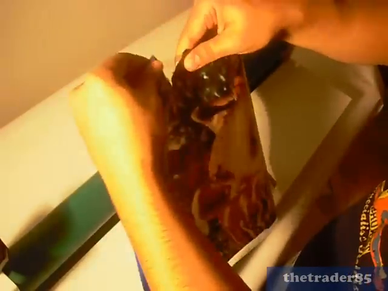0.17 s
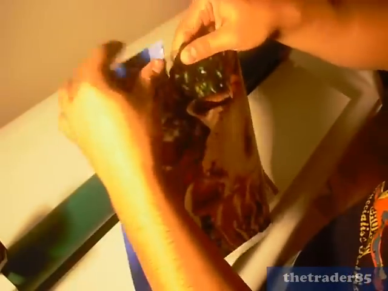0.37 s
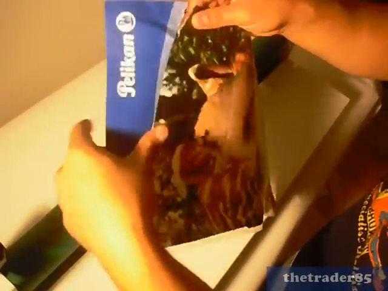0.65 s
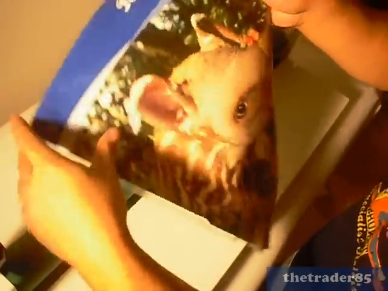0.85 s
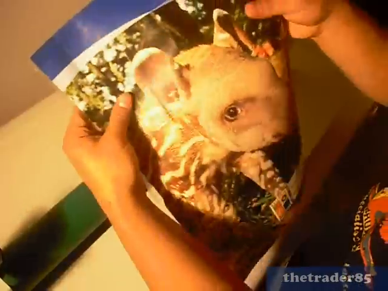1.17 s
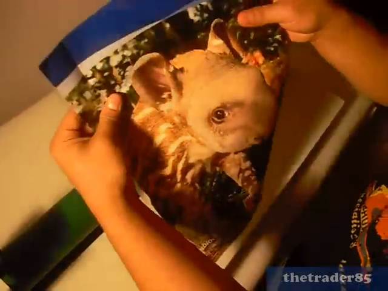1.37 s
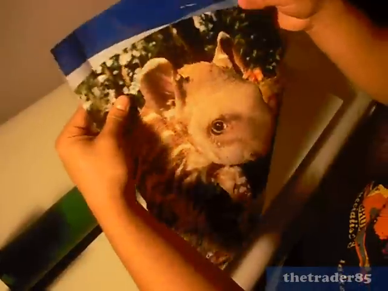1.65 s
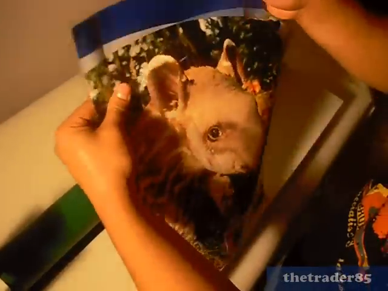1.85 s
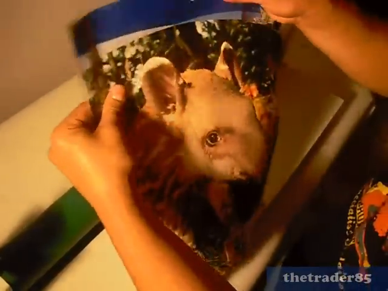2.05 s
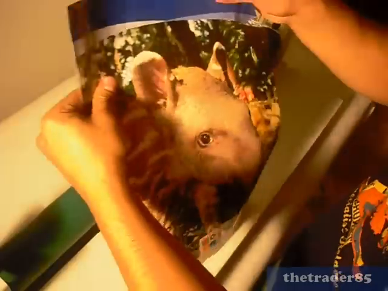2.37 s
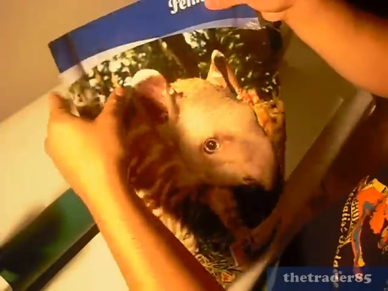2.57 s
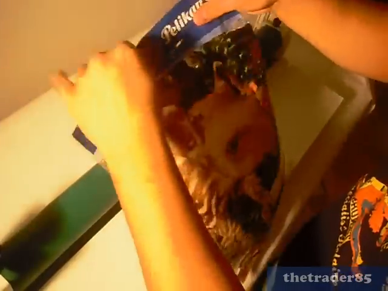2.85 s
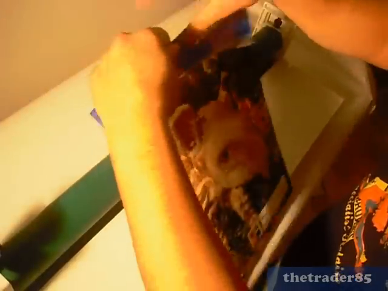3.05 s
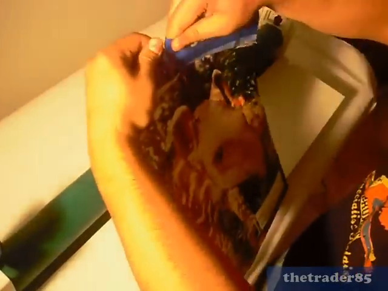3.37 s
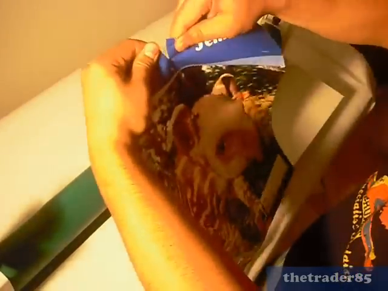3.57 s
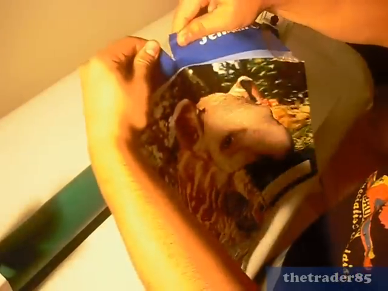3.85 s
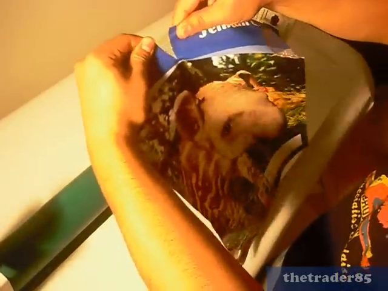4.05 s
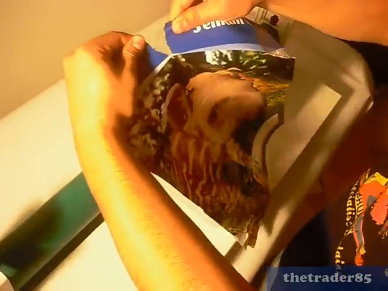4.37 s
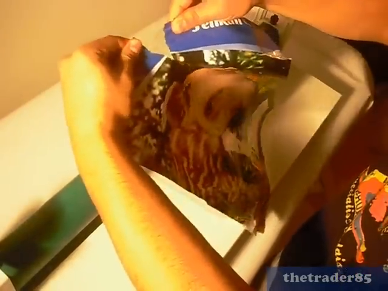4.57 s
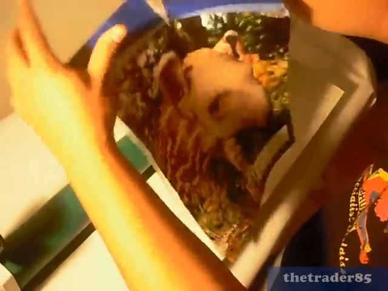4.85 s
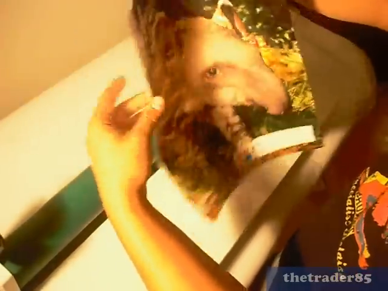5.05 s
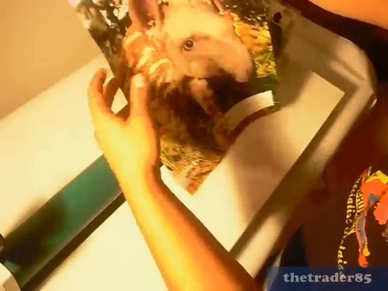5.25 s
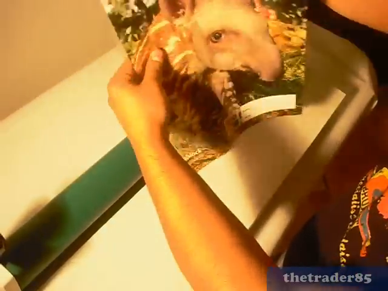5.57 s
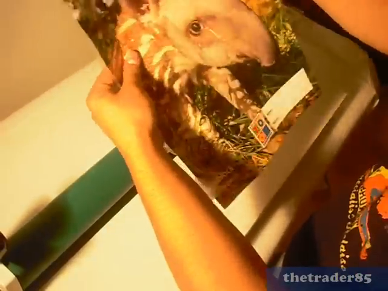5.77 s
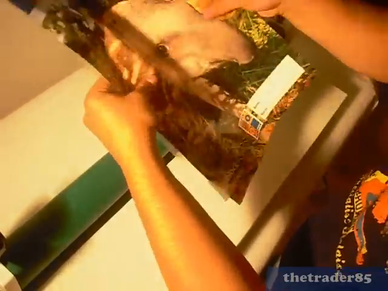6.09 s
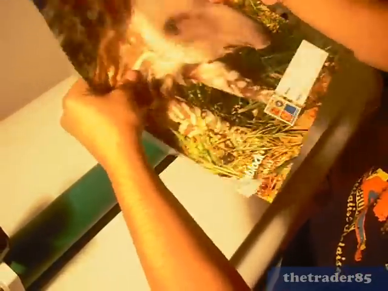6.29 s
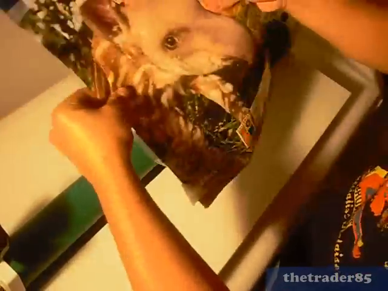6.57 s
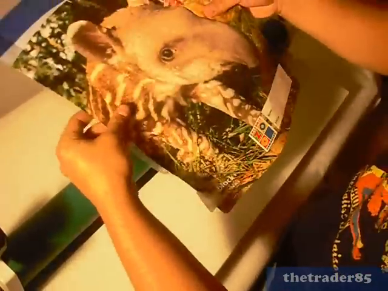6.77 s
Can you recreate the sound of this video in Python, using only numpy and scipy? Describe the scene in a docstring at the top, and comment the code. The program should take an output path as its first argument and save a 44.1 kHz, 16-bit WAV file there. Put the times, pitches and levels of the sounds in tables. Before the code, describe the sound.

Close to the microphone, hands bend a stiff glossy sheet in a small hard room. Sparse light crinkles thicken into hollow creasing pops, leading to a hard flap a little after two seconds. Quieter dry ticks and faint rustle follow, with one bright sharp snap near five seconds. At the end come violent cracks, the loudest clipping the input with a low thump, over faint room hush and a very high whine.

```python
"""Flexing a laminated sheet

Hands flex a laminated sheet close to a microphone in a small hard room. Each crease that snaps through is
a short volley of noise ringing the sheet's resonances; short bursts make ticks, crackles and hiss make
rustle, and fingers swish. Two hard flaps overload the input, and a low decaying swing thumps at the hardest.
Fading noise and lingering tones form the room; shaped noise is its hush, two steady tones the screens' whine."""
import sys
import numpy as np
from scipy import signal
from scipy.fft import rfft, irfft
from scipy.io import wavfile
from scipy.ndimage import uniform_filter1d

SR = 44100
rng = np.random.default_rng(int(sys.argv[2]) if len(sys.argv) > 2 else 0)


def unload_audio(sound):
    """Save the sound as a 16-bit wav file, at the path given as the first command line argument."""
    columns = np.transpose(np.atleast_2d(sound))
    # keep every value between -1 and 1, then stretch to whole-number steps
    steps = np.round(np.clip(columns, -1, 1) * 32767)
    wavfile.write(sys.argv[1], SR, steps.astype(np.int16))


N = 305172  # length of the scene in samples

# Creases snapping through. Each row: start in seconds, then peak levels in dB of the flap of air, the sheet's
# body, the crack and the film, then length in ms (kept within 0.3 to 10 when played), room share in dB.
SNAPS = [(0.0157, -59, -43, -40.5, -65, 3, 7), (0.0908, -59, -47, -24.5, -20.5, 2.4, 7),
         (0.4617, -46, -47, -38, -36.5, 0.86, 11.5), (0.4858, -55, -34, -35, -31, 5.5, 3),
         (0.6252, -71, -50, -38, -36.5, 3.8, 1), (0.8542, -68, -54, -36.5, -41, 3.8, 2),
         (1.0639, -44.5, -31.5, -34, -57, 1.8, 3), (1.1409, -31, -33.5, -31, -31, 2.3, 4),
         (1.1718, -41, -30.5, -29, -28.5, 0.99, -10), (1.1804, -43, -30, -29, -56, 2, 1.5),
         (1.2246, -58, -34.5, -20.5, -23, 1.6, 0), (1.2471, -64, -39, -36, -65, 2.4, 4),
         (1.3499, -39, -30.5, -39, -63, 6.2, 2.5), (1.4824, -35.5, -20.5, -27, -32, 3.4, 0),
         (1.7104, -50, -39.5, -38, -39, 1.2, 9.5), (1.8856, -59, -46, -28, -24, 2.3, -4.5),
         (1.9135, -39.5, -44, -44, -57, 3.1, 12), (1.9254, -49, -37, -48, -51, 1.6, 8.5),
         (1.9616, -39.5, -48, -17.5, -18, 2.3, -5), (2.0066, -49, -38.5, -32.5, -67, 1.5, 2.5),
         (2.1252, -41, -26, -27, -63, 0.57, 5.5), (2.1555, -37, -17.5, -20.5, -41, 2.1, 4.5),
         (2.1782, -40, -18.5, -12.5, -52, 3.9, -2), (2.18, -22.5, -27, -25, -24.5, 2.4, -2),
         (2.2176, -46, -30.5, -34, -56, 1.9, 8.5), (2.2886, -32, -21.5, -21.5, -43, 12, -0.5),
         (2.3035, -53, -41, -18, -58, 1.8, -5), (2.3532, -61, -30, -34, -52, 1.7, -10),
         (2.3788, -17, -13, -13, -21, 9.9, -12), (2.3858, -10, -8, -5.5, -21, 2.9, -2),
         (2.6618, -56, -39, -36, -45, 2, 1), (2.8636, -56, -57, -38.5, -34.5, 8.2, 9.5),
         (2.9988, -63, -41.5, -41.5, -46, 2.2, 6), (3.021, -48, -43, -31, -32.5, 2.4, -19),
         (3.0382, -71, -41, -48, -56, 1.6, 6.5), (3.1843, -65, -30.5, -31.5, -25.5, 4.8, 2.5),
         (3.3498, -44, -29, -28.5, -74, 4.5, 0), (3.4337, -55, -36, -27.5, -20.5, 2.3, 4.5),
         (3.5355, -49, -34.5, -34.5, -31, 3, 3), (3.6798, -50, -28.5, -16.5, -15.5, 2.4, 0.5),
         (4.0098, -63, -50.5, -44.5, -38, 3, 6.5), (4.1448, -61, -34, -30, -25.5, 1.4, 1.5),
         (4.283, -60, -35, -35, -31, 1.2, 1), (4.3569, -71, -37, -38, -49, 1.3, -5),
         (4.4954, -72, -34, -34, -33, 1.4, 5.5), (4.6204, -64, -48, -39.5, -36, 3.2, 11),
         (4.8059, -52, -38.5, -32.5, -31.5, 2.9, 2.5), (4.88, -52, -34, -28.5, -29, 2.4, 3),
         (4.8903, -62, -31, -28, -43, 6.3, -1), (4.9143, -61, -23.5, -7.5, -9.5, 1.6, -39),
         (4.9242, -40, -29, -37, -18, 1.5, -25), (5, -53, -45.5, -34.5, -32, 2.3, -3),
         (5.097, -61, -48, -39, -36.5, 1.6, 10), (5.1398, -59, -27, -31, -31.5, 1.1, 2.5),
         (5.1484, -40, -56, -26, -39, 2.2, 2.5), (5.2348, -57, -38.5, -35, -36, 3.6, 3.5),
         (5.5143, -66, -51, -33, -41, 2.5, 1), (5.6536, -68, -44, -39, -39, 1.1, -8),
         (5.6825, -64, -42, -41, -54, 2.5, -10), (5.7072, -43, -36, -33, -35, 6.1, 2),
         (5.7193, -44, -34.5, -39, -41, 3.4, 5), (5.7667, -52, -43, -30.5, -35, 4.1, 1.5),
         (6.009, -52, -48, -44.5, -47, 2.5, 12), (6.0352, -61, -40.5, -33.5, -55, 1.15, 2),
         (6.0474, -66, -39.5, -53, -49, 8.9, 13.5), (6.0614, -42, -37, -20.5, -17, 2, 0.5),
         (6.1547, -44, -41, -50, -55, 1.9, 11), (6.1715, -62, -36, -46, -46, 7.4, 2),
         (6.1991, -42, -35, -32.5, -63, 2.5, -3), (6.2996, -49, -36, -63, -47, 4.2, 2),
         (6.3069, -25.5, -25, -36, -46, 1.4, 2), (6.3178, -36, -8, -15, -7.5, 4.2, 2),
         (6.323, -16.5, -6, 0.5, -35, 2.4, 0.5), (6.3292, -22, -0.5, -4.5, -42, 3.3, -3),
         (6.444, -47, -21, -24, -46, 3.2, 12), (6.4863, -39, -27, -11.5, -8.5, 2.2, -18),
         (6.5352, -38, -21, -42, -27, 6.9, -13), (6.5468, -7.5, 9.5, 4.5, -22, 6.4, -3),
         (6.6377, -51, -22, -27, -39, 1.8, -7)]
# How tightly the sheet is bent sets the body pitch of its snaps. Each row: time in seconds, pitch in Hz.
BEND = [(0, 694), (1.05, 670), (1.16, 500), (1.24, 730), (1.5, 470), (1.71, 670), (2.17, 760), (2.3, 604),
        (3.1, 605), (3.18, 720), (3.45, 590), (3.68, 880), (4.28, 820), (4.36, 516), (4.5, 920), (4.8, 630),
        (5.7, 595), (6.45, 554), (6.55, 857), (6.64, 860)]
# What the parts of the sheet ring with. Each row: pitch in Hz, width in Hz, relative level in dB.
FLAP = [(74.4, 103, -16), (161, 155, 4), (284, 130, 0)]
BODY = [(259.4, 72, -2), (537, 185, 4), (720, 120, 1), (960, 160, 1), (1370, 3000, -3)]
CRACK = [(1920, 1740, -7), (2262, 805, -2.5), (2856, 800, -3.5), (4260, 2420, -5)]
FILM = [(6500, 4140, 2.5), (9500, 21000, 3), (13800, 1400, -18.5)]
PITCH_SCATTER_OCT, BODY_SPREAD_OCT = 0.017, 0.87  # a snap favours the body modes near its pitch
CRACK_TILT = 0.37  # dB per octave for each dB of film over crack, counted from 14 dB below the crack
CRACK_SCATTER = 0.09  # every snap detunes the crack modes by about this fraction
RISE_SHARE = 0.069  # build-up time of a snap, in lengths
SHARP_SHARE = 22  # time of the treble's extra decay, in lengths


def snaps():
    """Each snap is a swelling, then dying volley of small releases, sent into every part of the sheet."""
    ms = np.arange(1600) / SR * 1000
    near, far = np.zeros((2, N + SR))
    for start, *levels, length, room_db in SNAPS:
        flap_db, body_db, crack_db, film_db = levels
        bend, *detune = np.clip(rng.standard_normal(1 + len(CRACK)), -2, 2)
        length = np.clip(length, 0.3, 10)
        swell = (1 - np.exp(-ms / (RISE_SHARE * length))) * np.exp(-ms / length)
        # the product of two noises is spikier than plain noise
        volley = rng.standard_normal(len(ms)) * np.abs(rng.standard_normal(len(ms))) * swell
        sharp = volley * np.exp(-ms / (SHARP_SHARE * length))  # the treble leaves first

        pitch_hz = np.interp(start, *np.transpose(BEND)) * 2 ** (PITCH_SCATTER_OCT * bend)
        body = [(hz, width, db - 6 * (np.log2(hz / pitch_hz) / BODY_SPREAD_OCT) ** 2)
                for hz, width, db in BODY]
        # a snap with much film in it cracks brighter
        tilt_db = CRACK_TILT * np.clip(film_db - crack_db + 14, -15, 15)
        crack = [(hz * (1 + CRACK_SCATTER * shift), width, db + tilt_db * np.log2(hz / 3000))
                 for (hz, width, db), shift in zip(CRACK, detune)]

        # the whole sheet pushes the air in one smooth stroke; the finer parts answer each release
        stroke = np.gradient(-swell)
        add(near, far, start, stroke, ring(FLAP), flap_db, room_db)
        add(near, far, start, volley, ring(body), body_db, room_db)
        add(near, far, start, sharp, ring(crack), crack_db, room_db)
        add(near, far, start, sharp, ring(FILM), film_db, room_db)
    return np.array([near[:N], far[:N]])


def ring(modes):
    """A struck part sounds as decaying resonances: wide ones die fast; signs alternate, total energy is 1."""
    t = np.arange(1024) / SR
    body = np.zeros(len(t))
    for k, (hz, width, db) in enumerate(modes):
        strength = (-1) ** k * undb(db) * np.sqrt(width)
        body += strength * np.exp(-np.pi * width * t) * np.sin(2 * np.pi * hz * t)
    return body / np.sqrt(np.sum(body ** 2))


def add(near, far, start, push, body, peak_db, room_db):
    """A push rings a body at a peak level; the walls get its energy, offset by the room share, in plain colour."""
    sound = signal.fftconvolve(push, body)
    sound *= undb(peak_db) / np.max(np.abs(sound))
    at = int(start * SR)
    near[at:at + len(sound)] += sound
    far[at:at + len(body)] += body * undb(room_db) * np.sqrt(np.sum(sound ** 2))


# The clearest lone ticks of the film. Each row: start in seconds, peak level in dB, colour (band centre) in Hz.
TICKS = [(0.0245, -35, 6600), (0.083, -30, 9500), (0.09, -25, 9600), (0.1075, -21, 9700),
         (0.1244, -31, 9500), (0.1365, -21.5, 7200), (0.466, -31.5, 5170), (0.5033, -31.5, 6900),
         (0.5241, -34, 4670), (0.9218, -41, 7800), (1.106, -36.5, 4500), (1.1858, -38, 4200),
         (1.2077, -35, 6000), (1.2215, -37, 5800), (1.3327, -37, 4800), (1.4026, -42, 3900),
         (1.4342, -36, 5000), (1.4928, -38, 4400), (1.5087, -28, 4700), (1.643, -47, 5100),
         (1.736, -37, 6500), (1.777, -38, 6300), (1.8041, -39, 5700), (1.8403, -35.5, 3500),
         (1.856, -45, 4900), (1.9741, -26.5, 7000), (2.1178, -37.5, 6560), (2.1858, -27, 5460),
         (2.384, -16, 5020), (2.4909, -27, 5900), (2.5085, -30.5, 6500), (2.525, -33, 5360),
         (2.5687, -35.5, 5000), (2.6866, -51, 5400), (2.8782, -31.5, 7300), (2.9543, -37.5, 4850),
         (3.0066, -42, 6500), (3.0985, -43, 7840), (3.4384, -29, 6300), (3.5552, -34, 8500),
         (3.593, -42, 8200), (3.6393, -37, 9800), (3.6704, -41, 9800), (3.7334, -34.5, 7900),
         (3.7901, -36, 9900), (3.8202, -32.5, 7260), (3.9298, -38.5, 7500), (4.0188, -37, 8700),
         (4.1095, -37, 8900), (4.1292, -38, 8100), (4.186, -33, 7540), (4.2755, -36, 8850),
         (4.3302, -35, 8400), (4.3444, -37, 7400), (4.4036, -35, 8200), (4.4859, -37, 8200),
         (4.5484, -36, 6000), (4.6471, -33, 7200), (4.8397, -36, 6640), (4.8686, -36, 7100),
         (4.9028, -28, 7100), (4.959, -35, 8600), (5.0314, -44, 7300), (5.1522, -33, 5550),
         (5.247, -34, 6260), (5.3385, -42, 5900), (5.3818, -40, 6160), (5.4143, -40, 6500),
         (5.5122, -34.5, 5930), (5.884, -37.5, 5650), (5.9636, -44, 5540), (6.0642, -20, 5100),
         (6.1242, -36, 5700), (6.4314, -30, 4000), (6.4652, -21.5, 5940), (6.5198, -21, 5140),
         (6.5534, 7, 4100), (6.5917, -13, 4300), (6.6064, -24, 4460)]
TICK_MS, TICK_WIDTH, TICK_ROOM_DB = 1, 1.52, 2  # decay time, band edges as a ratio, room share


def ticks():
    """Each small buckle of the film gives a very short broad burst of noise."""
    ms = np.arange(200) / SR * 1000
    click = ms == 0
    near, far = np.zeros((2, N + SR))
    for start, db, hz in faint_ticks() + TICKS:
        edges = [hz / TICK_WIDTH, min(hz * TICK_WIDTH, SR / 2.5)]
        band = signal.butter(2, edges, "bandpass", fs=SR, output="sos")
        body = signal.sosfilt(band, click)
        body /= np.sqrt(np.sum(body ** 2))
        burst = rng.standard_normal(len(ms)) * np.exp(-ms / TICK_MS)
        add(near, far, start, burst, body, db, TICK_ROOM_DB)
    return np.array([near[:N], far[:N]])


FAINT_TICKS_PER_S = 30
FAINT_TICK_DB, FAINT_SPREAD_DB = 15.5, 1  # peak over the handling level of the film, and its scatter
FAINT_TICK_HZ, FAINT_SCATTER_OCT = 6500, 0.2


def faint_ticks():
    """Small buckles at random times, louder while the hands work the film more: rows like TICKS."""
    count = int(FAINT_TICKS_PER_S * N / SR)
    at = rng.random(count) * N / SR
    size, colour = np.clip(rng.standard_normal((2, count)), -2, 2)
    film_db = handling_db(at)[2]
    db = film_db + FAINT_TICK_DB + FAINT_SPREAD_DB * size
    hz = FAINT_TICK_HZ * 2 ** (FAINT_SCATTER_OCT * colour)
    return list(zip(at, db, hz))


CRACKLES_PER_S, CRACKLE_SHARE = 900, 0.49  # share of the rustle's power; sliding hiss has the rest
CRACKLE_SPREAD_DB = 2.5  # scale of the extra size of the larger crackles


def rustle():
    """Tiny random crackles and the hiss of skin and film sliding both ring body, crack and film."""
    count = int(CRACKLES_PER_S * N / SR)
    at = rng.integers(0, N, count)
    size_db = CRACKLE_SPREAD_DB * np.minimum(rng.exponential(size=count), 4)
    out = np.zeros(N)
    for db, modes in zip(rustle_db(), (BODY, CRACK, FILM)):
        # each crackle reaches each part with a strength of its own, so each has its own colour
        part_db = size_db + 5.1 * rng.standard_normal(count)
        clicks = np.zeros(N)
        clicks[at] = undb(part_db) * rng.choice([-1, 1], count)
        clicks /= np.sqrt(np.mean(clicks ** 2))
        slide = undb(0.65 * walk(25)) * rng.standard_normal(N)
        push = np.sqrt(CRACKLE_SHARE) * clicks + np.sqrt(1 - CRACKLE_SHARE) * slide
        out += undb(db) * signal.fftconvolve(push, ring(modes))[:N]
    return out


# After a snap the sheet goes on rustling; values for body, crack and film.
SETTLE_DB = (-31.5, -43, -36.5)  # level against the snap
SETTLE_T60_S = (0.26, 0.6, 0.15)  # time to fall 60 dB


def rustle_db():
    """Rustle levels over time: the power of the handling plus that of the settling after every snap."""
    t = np.arange(N) / SR
    coarse = t[::64]  # handling changes slowly enough for a coarser time step
    rows = np.array(SNAPS)
    starts = (rows[:, 0] * SR).astype(int)
    out = []
    for db, snap_db, settle_db, t60 in zip(handling_db(coarse), rows[:, 2:5].T, SETTLE_DB, SETTLE_T60_S):
        kicks = np.zeros(N)
        kicks[starts] = undb(snap_db + settle_db) ** 2
        settling = signal.lfilter([1], [1, -1000 ** (-2 / (t60 * SR))], kicks)
        handling = undb(np.interp(t, coarse, db)) ** 2
        out.append(10 * np.log10(handling + settling))
    return out


# Bouts of fine rustle as the hands move the sheet. Each row: start in seconds, hold in seconds,
# then the levels in dB of body, crack and film.
RUSTLE = [(0.081, 0.037, -48.5, -48.5, -48), (0.45, 0.11, -59.5, -64.5, -67.5),
          (0.666, 0.18, -65.5, -65, -61.5), (0.885, 0.12, -66, -65, -59), (1.115, 0.17, -51.5, -57, -61.5),
          (1.323, 0.055, -47, -65, -73), (1.476, 0.065, -51, -74, -75), (1.72, 0.15, -61.5, -65, -60.5),
          (1.9, 0.085, -51.5, -61, -60.5), (2.157, .1, -48, -51.5, -71), (2.29, 0.054, -44, -50, -67),
          (2.375, 0.086, -38.5, -42.5, -67), (2.599, .2, -62, -68, -65), (2.98, 0.18, -63, -65, -63.5),
          (3.345, 0.07, -61.5, -69, -79), (3.47, 0.16, -63, -69, -57), (3.675, 0.15, -59.5, -60, -57),
          (3.962, 0.17, -70, -67, -61), (4.118, 0.14, -76, -62, -62), (4.259, 0.16, -60, -65.5, -62),
          (4.48, 0.2, -65, -65, -63), (4.808, 0.073, -57, -58, -59), (5.134, 0.052, -48, -62, -50.5),
          (5.3, 0.1, -57, -60.5, -59), (5.556, 0.16, -69, -66, -64.5), (5.689, 0.094, -56, -67, -63),
          (6.032, 0.1, -60, -62, -57.5), (6.16, 0.05, -53, -65, -62), (6.333, 0.035, -31.5, -44, -48),
          (6.443, .11, -45, -43, -47), (6.556, .02, -29, -27.5, -53)]
# Levels in dB of body, crack and film while the hands only hold the sheet.
IDLE_DB = (-66.5, -68, -67.5)
RUSTLE_ATTACK_S = 0.017
RUSTLE_FALL_DB_S = 237  # fall in dB per second of a bout at -60 dB
SLOWER_DB_S_PER_DB = 4.5  # a stronger bout dies away more slowly, by this much per dB


def handling_db(t):
    """Level of body, crack and film rustle at times t: each bout rises, holds and falls away."""
    start, hold, *columns = np.transpose(RUSTLE)[:, :, None]
    rise = np.clip((t - start) / RUSTLE_ATTACK_S, 0, 1)
    after = np.maximum(t - start - hold, 0)
    out = []
    for db, idle_db in zip(columns, IDLE_DB):
        fall_db_s = np.maximum(RUSTLE_FALL_DB_S - SLOWER_DB_S_PER_DB * (db + 60), 60)
        bouts = undb(db - fall_db_s * after) * rise
        out.append(10 * np.log10(np.sum(bouts ** 2, axis=0) + undb(idle_db) ** 2))
    return out


# Fingers sliding. Each row: start in seconds, end in seconds, pitch in Hz, width in Hz,
# middle level in dB (it wavers around this).
SWISHES = [(0.695, .83, 4790, 200, -64), (0.71, 0.78, 560, 198, -54), (0.732, .82, 2980, 600, -65),
           (0.877, 0.903, 3330, 700, -59), (0.93, 0.947, 6860, 2500, -54), (3.352, 3.435, 2780, 1200, -57),
           (3.436, 3.507, 5640, 1500, -60.5)]


def swishes():
    """Fingers sliding over the film: noise through one resonance, a hiss that swells, flutters and fades."""
    t = np.arange(N) / SR
    out = np.zeros(N)
    for start, end, hz, width, db in SWISHES:
        progress = np.clip((t - start) / (end - start), 0, 1)
        swell = np.maximum(np.sin(np.pi * progress), 0) ** 0.5
        hiss = signal.fftconvolve(rng.standard_normal(N), ring([(hz, width, 0)]))[:N]
        out += undb(db + 6 * walk(37)) * swell * hiss
    return out


# Low thump of air pushed by the hardest flap. Each row: start in seconds, level in dB before it dies away,
# pitch in Hz.
THUMPS = [(6.545, 0.5, 57)]


def thumps():
    """A low thump of air pushed by the hardest flap: a slow dip and rebound, a sine that dies within a few
    cycles."""
    t = np.arange(N) / SR
    out = np.zeros(N)
    for start, db, hz in THUMPS:
        cycles = np.maximum(t - start, 0) * hz
        out -= undb(db) * np.sin(2 * np.pi * cycles) * np.exp(-2.5 * cycles)
    return out


# Reflections by octave. Each row: band centre in Hz, time to fall 60 dB in seconds,
# level in dB against the sound sent to the walls.
ROOM = [(105, 0.1, -14), (223, 0.6, -7.5), (430, 0.12, -15), (985, 0.49, -9), (1770, 0.31, -1),
        (4100, 0.28, -4), (8600, 0.38, -10), (15700, 0.1, -1.5)]
# Standing waves between table and walls. Each row: pitch in Hz, time to fall 60 dB in seconds, energy in dB.
STANDING = [(202.1, 0.7, -28.5), (273.7, 0.16, -30.5), (350, 0.29, -31), (424.8, 0.5, -35.5),
            (518, 0.21, -31.5), (555.6, 0.16, -29), (624, 0.54, -34.5), (701.7, 0.072, -30.5),
            (753, 0.6, -32.5), (866, 0.31, -24), (910, 1, -50), (995, 0.91, -43), (976, 0.24, -28),
            (1070, 0.71, -36), (1134, 0.44, -31)]
ROOM_GAP_MS = 1.53  # time scale on which the reflections build up


def room(x):
    """Diffuse reflections: noise that builds up, then dies band by band; some low pitches linger."""
    t = np.arange(SR) / SR
    gaps = t * 1000 / ROOM_GAP_MS
    tail = np.zeros(len(t))
    for hz, t60, db in ROOM:
        edges = [hz / 1.45, min(hz * 1.45, SR / 2.2)]
        sos = signal.butter(2, edges, "bandpass", fs=SR, output="sos")
        band = signal.sosfilt(sos, rng.standard_normal(len(t)))
        band *= np.exp(-np.log(1000) * t / t60) * np.clip(gaps, 0, 1) ** 2
        width = (edges[1] - edges[0]) / (SR / 2)  # a wider band carries more energy
        tail += undb(db) * band * np.sqrt(width / np.sum(band ** 2))
    for hz, t60, db in STANDING:
        wave = np.sin(2 * np.pi * (hz * t + rng.random()))
        wave *= np.exp(-np.log(1000) * t / t60) * (1 - np.exp(-gaps))
        wave *= 1 + 0.5 * np.sin(2 * np.pi * (0.0149 * hz * t + rng.random()))  # close neighbours beat
        tail += undb(db) * wave / np.sqrt(np.sum(wave ** 2))
    return signal.fftconvolve(x, tail)[:N]


# Colour of the room's hush. Each row: frequency in Hz, relative level in dB per Hz.
HUSH = [(18, -13), (40, 7.5), (176, -1), (420, -10.5), (550, -8.5), (980, -5), (1380, -11), (2890, -15.5),
        (5590, -17), (10000, -21), (13700, -11), (17000, -16)]
# Whine of two screens. Each row: pitch in Hz, rms level in dB.
WHINES = [(15734.3, -66.5), (15747.2, -70)]
HUSH_DB = -62  # middle rms level; it drifts around this


def background():
    """Hush of room and preamplifier is coloured noise; the line whines of two screens beat together."""
    t = np.arange(N) / SR
    out = undb(HUSH_DB + 0.98 * walk(2.2)) * coloured(N, HUSH)
    for hz, db in WHINES:
        out += np.sqrt(2) * undb(db) * np.sin(2 * np.pi * (hz * t + rng.random()))
    return out


def coloured(size, points):
    """Noise of rms 1 with a spectrum drawn through (Hz, dB) points."""
    hz, db = np.transpose(points)
    f = np.arange(size // 2 + 1) * SR / size + 1  # the 1 keeps the logarithm finite
    gain = undb(np.interp(np.log(f), np.log(hz), db))
    noise = irfft(rfft(rng.standard_normal(size)) * gain, size)
    return noise / np.sqrt(np.mean(noise ** 2))


def walk(rate):
    """Random levels, a new one every 1 / rate seconds, smoothed twice; spread near 1."""
    k = int(SR / rate)
    steps = np.repeat(rng.standard_normal(N // k + 1), k)
    return 1.3 * uniform_filter1d(uniform_filter1d(steps, k), k)[:N]


def undb(db):
    """Turns dB into a plain amplitude factor."""
    return 10 ** (np.asarray(db) / 20)


def scene():
    """Adds the direct sounds, their reflections and the background."""
    # rustle and swishes go to the microphone and the walls alike
    near, far = snaps() + ticks() + rustle() + swishes()
    return (near + thumps() + room(far) + background())[None]


CEILING = 0.62  # amplitude where the input clips
SLOPE_HZ, TOP_HZ = 15900, 16900


def record(dry):
    """The input clips with a short knee; the top rolls off, then is cut."""
    clipped = dry / (1 + np.abs(dry / CEILING) ** 6) ** (1 / 6)
    slope = signal.cheby1(14, 0.5, SLOPE_HZ, fs=SR, output="sos")
    cut = signal.ellip(8, 0.2, 70, TOP_HZ, fs=SR, output="sos")
    return signal.sosfilt(cut, signal.sosfilt(slope, clipped))


dry = scene()
out = record(dry)
unload_audio(out)
```